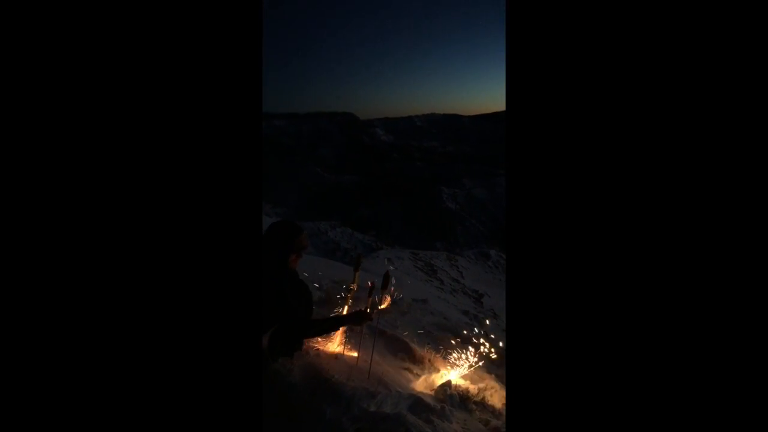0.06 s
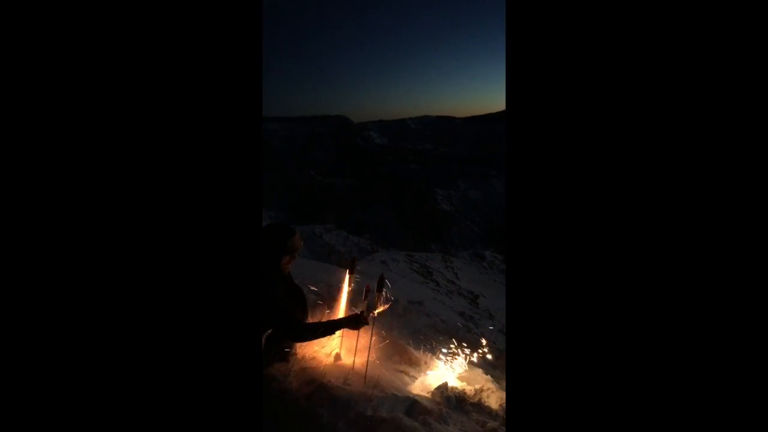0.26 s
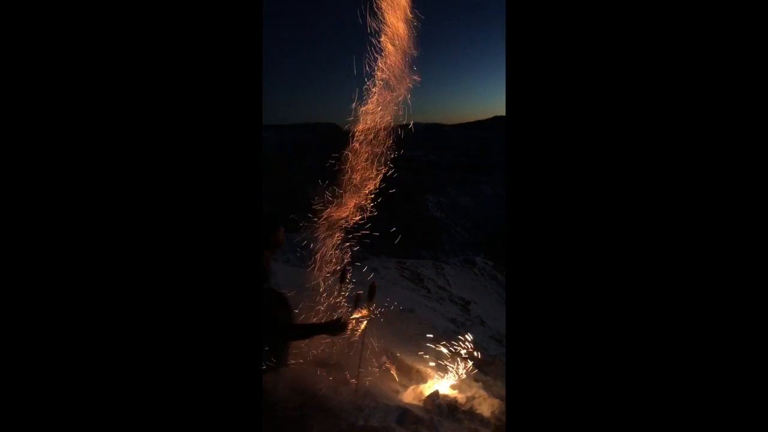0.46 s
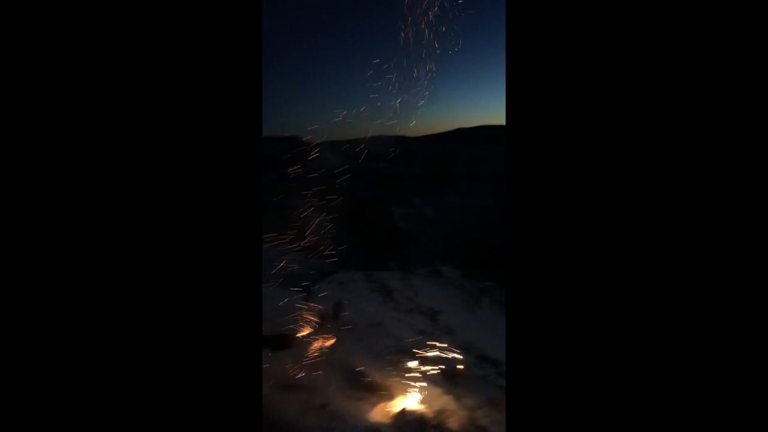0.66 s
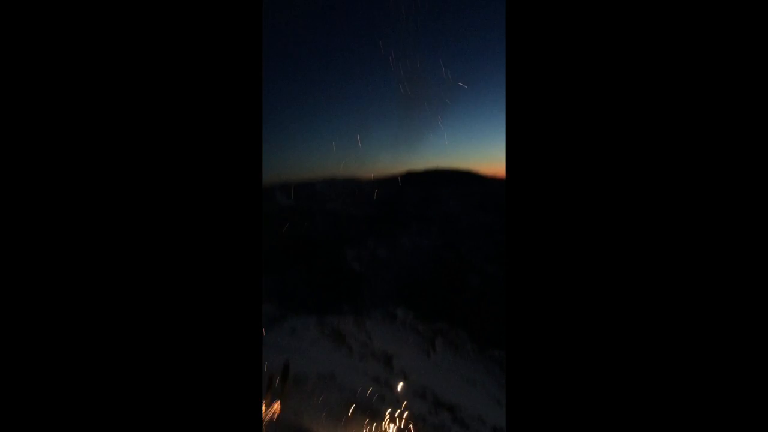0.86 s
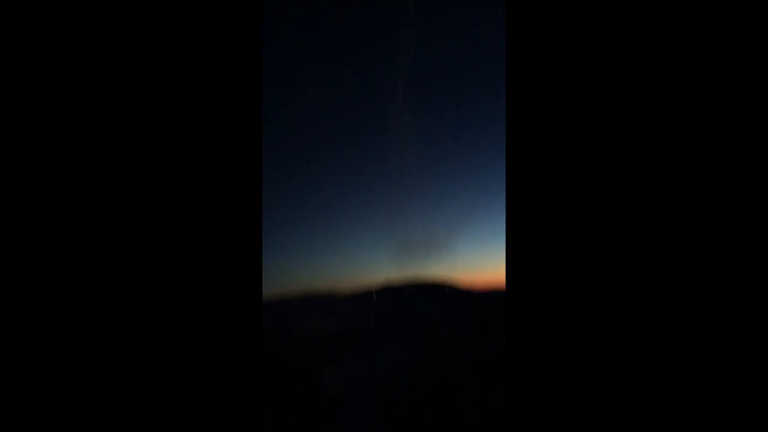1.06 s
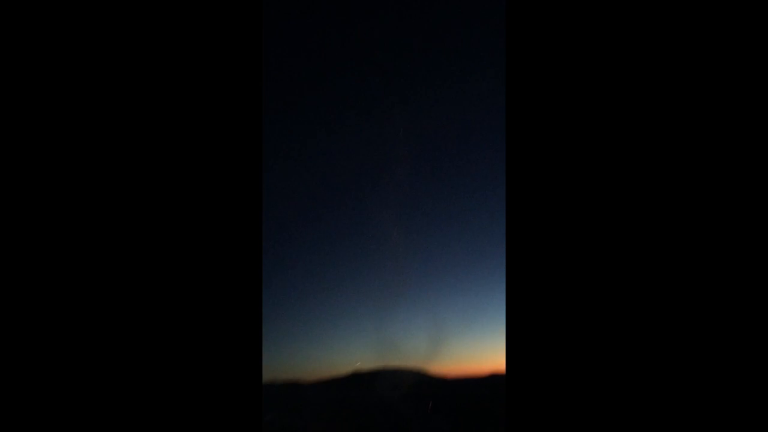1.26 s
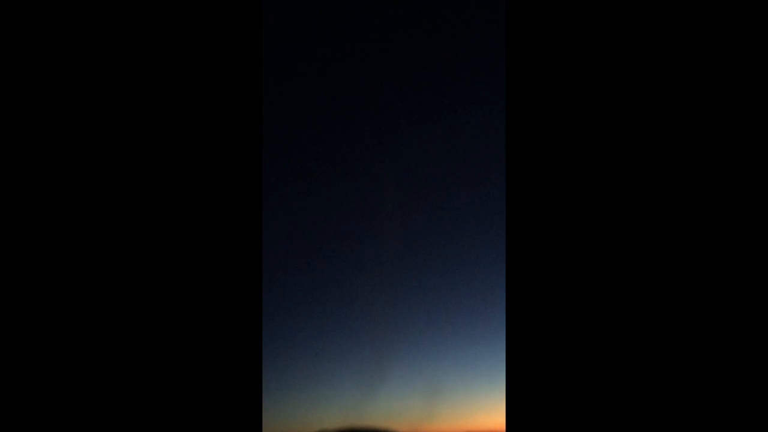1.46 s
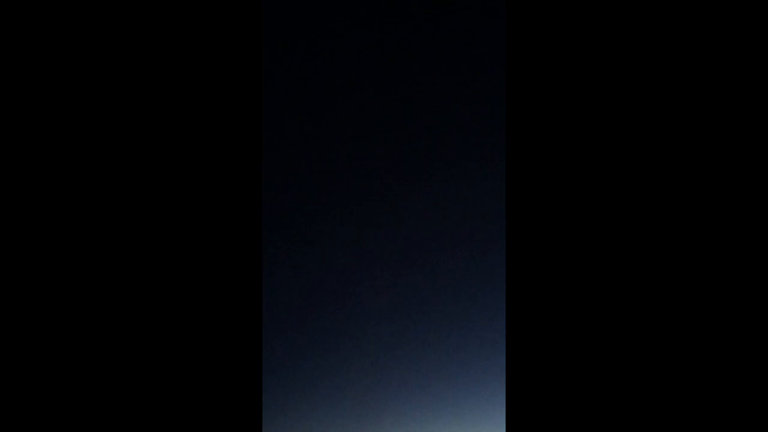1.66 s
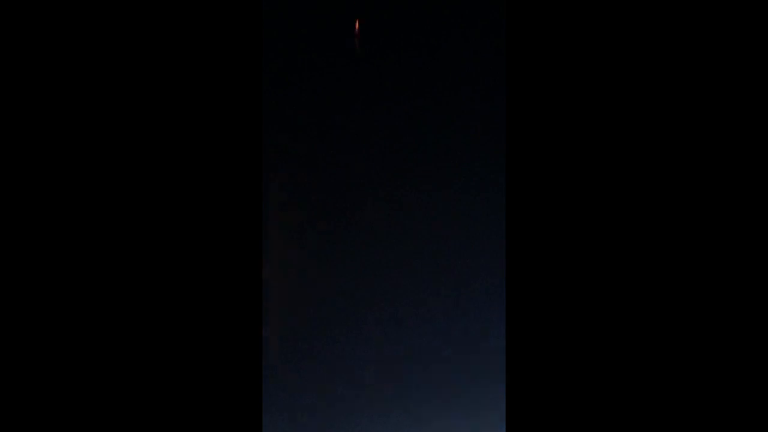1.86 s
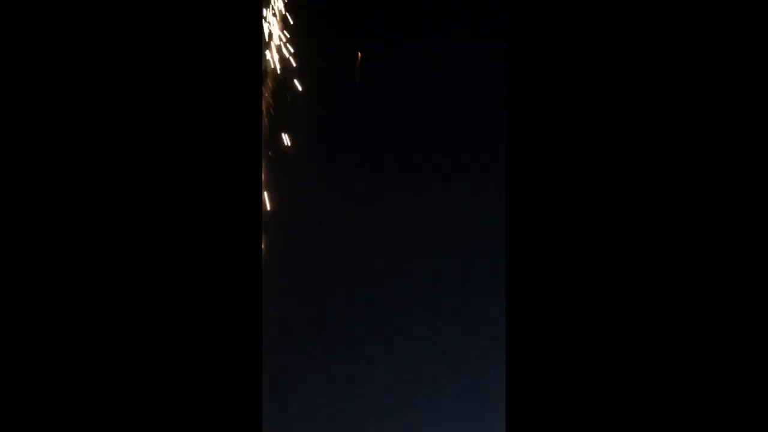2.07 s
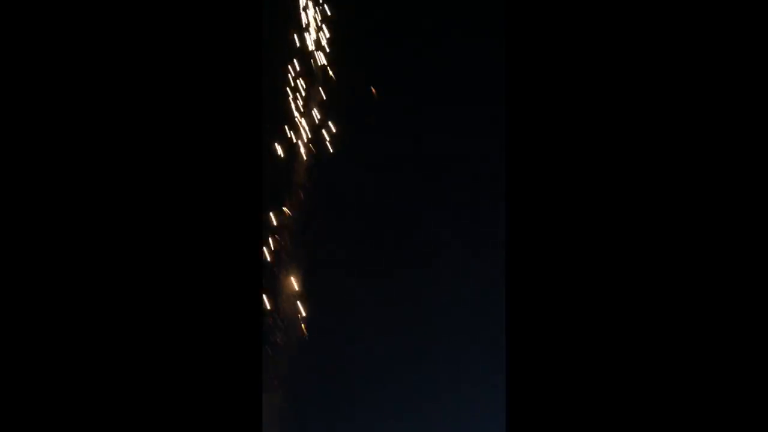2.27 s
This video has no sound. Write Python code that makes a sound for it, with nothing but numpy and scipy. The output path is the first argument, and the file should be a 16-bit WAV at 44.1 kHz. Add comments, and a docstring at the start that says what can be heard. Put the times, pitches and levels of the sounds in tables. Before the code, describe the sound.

Outdoors, close and dry, a firework rocket hiss swells quickly, pops and fades; after a quiet gap with faint sizzle and handling ticks, a second spits, rushes louder, thumps hard and dies away.

```python
"""Two firework rockets take off close by, one after the other, each with a rough, spitting hiss.
The hiss is grainy noise shaped by moving resonances, over a low roar with a sinking hollow note.
Shifting ground echoes colour it; a short pop of exhaust hits the microphone before each hiss dies.
Fuses sizzle faintly throughout, with air buffets, powder spits and a hand on the camera."""
import sys
import numpy as np
from scipy import signal
from scipy.fft import rfft, irfft
from scipy.io import wavfile
from scipy.ndimage import uniform_filter1d, map_coordinates

SR = 44100
rng = np.random.default_rng(int(sys.argv[2]) if len(sys.argv) > 2 else 0)


def pcm_store(signal):
    """Save signal as 16-bit PCM."""
    levels = np.round(np.clip(np.atleast_2d(signal), -1, 1) * 32767)
    wavfile.write(sys.argv[1], SR, levels.astype(np.int16).T)


N = 101429
TIME = np.arange(N) / SR  # seconds

# faint sizzle of the fuses: time_s, level_db
FUSE_LEVEL = [(0, -59), (.8, -55.5), (.88, -57.5), (1.0, -53.5), (1.22, -50.5), (2.0, -37.5), (2.13, -62.5),
              (2.23, -55), (2.3, -62)]
# colour of the fuses: frequency_hz, level_db
FUSE_COLOUR = [(25, -25), (60, -14), (170, -11.5), (300, -8), (600, -10.5), (1200, -10.5), (2500, -9),
               (5500, -10), (11000, -14), (15000, -15.5)]
# a last hiss, still growing when the sound ends: peak_s, level_db, rise_s, decay_s
LAST_SWELL = (3, -51, 1.35, 1)
# colour of that last hiss: frequency_hz, level_db
LAST_SWELL_COLOUR = [(150, -16), (500, -11.5), (1050, -2), (1600, -7.5), (3300, -13), (4200, -5),
                     (5000, -15), (5700, -3.5), (7500, -13), (15000, -20)]

# dry ticks of the hand on the camera: peak_s, level_db
TICKS = [(.917, -47.5), (0.946, -50), (1.074, -42), (1.329, -40)]
# colour of the ticks: frequency_hz, level_db
TICK_COLOUR = [(60, -2), (900, 2), (3000, -5), (6000, -22), (15000, -32)]
TICK_RISE_S, TICK_DECAY_S = 0.0004, 0.0027
# deep rustle of the hand: time_s, level_db
HAND_LEVEL = [(.75, -79), (.9, -68), (1.08, -62), (1.42, -66), (1.55, -80)]
# colour of the rustle: frequency_hz, level_db
HAND_COLOUR = [(20, -7.5), (45, -2), (80, -2), (130, -14), (400, -37)]

# gusts that buffet the microphone: peak_s, level_db, rise_s, decay_s
GUSTS = [(0.055, -47, 0.0046, 0.021), (.352, -40.5, 0.064, 0.045), (.39, -30, 0.009, 0.011),
         (0.919, -59.5, 0.0035, 0.05), (1.255, -62, 0.0037, 0.021), (1.474, -45, 0.0078, 0.019),
         (1.592, -35, 0.0083, 0.0066), (1.918, -41, .006, 0.012), (2.03, -53, 0.016, 0.023)]
# colour of stirred air, in gusts and pops: frequency_hz, level_db
RUMBLE_COLOUR = [(20, -7), (45, -8.5), (80, 4), (150, 3.5), (260, -6.5), (600, -24), (2000, -65)]
# single spits of burning powder: peak_s, level_db, decay_s
SPITS = [(1.471, -37, .007), (1.551, -21, 0.011), (1.593, -22, 0.0024), (1.919, -20, 0.0018)]
# colour of the spits: frequency_hz, level_db
SPIT_COLOUR = [(60, -10), (200, -1), (700, 12.5), (2500, 9.5), (4500, 9), (7000, -12), (15000, -30)]

# pops of exhaust: start_s, push_db, push_length_s, crack_db, whump_pitch_hz, whump_db,
# rumble_db, decay_s
POPS = [(0.485, -22, 0.003, -24, 121, -20, -25, 0.021), (1.876, -6.5, 0.0023, -15, 179, -15.5, -20.5, .02)]
# colour of the dull crack in a pop: frequency_hz, level_db
CRACK_COLOUR = [(60, -17.5), (200, -12), (400, 0), (660, 9), (880, -3.5), (1300, -3.5), (2000, -9),
                (6000, -29)]
POP_SWELL_S, CRACK_DECAY_S, CRACK_LEAD_S = 0.0091, 0.0028, 0.0016
PUSH_LOW_HZ, PUSH_HIGH_HZ = 65.4, 332
WHUMP_END_HZ, WHUMP_SINK_S = 49, 0.01

# hiss of each rocket: time_s, level_db, treble_db (set against TREBLE_USUAL_DB, then stretched)
BURN_A = [(0.0, -39, -12.5), (0.132, -32.5, -6), (0.364, -10.5, -6.5), (0.404, -13.5, -11), (0.44, -16, -8),
          (0.494, -14, -10.5), (0.656, -24.5, -17), (0.736, -36, -15), (0.8, -66.5, -13)]
BURN_B = [(1.235, -62, -17), (1.28, -42.5, -16), (1.335, -35.5, -10), (1.454, -27.5, -5),
          (1.472, -22.5, -8), (1.506, -27, -5), (1.564, -17.5, -8), (1.63, -17, -7), (1.764, -13.5, -12.5),
          (1.914, -15.5, -8), (2.042, -28, -13.5), (2.064, -33.5, -13), (2.13, -73, -10)]
TREBLE_FROM_HZ, TREBLE_FULL_HZ, TREBLE_USUAL_DB, TREBLE_STRETCH = 3050, 12100, -9.5, 1.71
# basic colour of each hiss: frequency_hz, level_db
JET_A = [(40, -58), (200, -35), (480, -19.5), (750, -8), (1000, -5), (1300, -2.5), (1750, -1.5), (3100, -1),
         (5000, -2.5), (6400, -2), (9700, -3.5), (10300, -7.5), (11200, -4.5), (15000, -7.5)]
JET_B = [(150, -51), (480, -15.5), (750, -10), (1150, -1), (1600, -1.5), (2100, 2), (3500, -0.5), (4950, 0),
         (6000, 0), (9800, -2.5), (10350, -8), (11200, -5), (15000, -8)]
# level_db of sparks against the gas; spread_db of their random sizes
SPARKS_PER_S, SPARK_DB, SPARK_SPREAD_DB = 2500, -9, 1
# resonances and notches that come and go: frequency_hz, width_hz, boost_db, strongest_s, lasting_s
RINGS_A = [(1036, 280, 9, 0.24, 0.17), (1710, 310, 7, 0.2, 0.18), (2460, 310, 6, 0.18, 0.22),
           (3020, 150, 10, 0.18, 0.22), (4080, 160, 8.5, 0.1, 0.29), (5850, 170, 11, 0.19, 0.099),
           (6390, 270, 8, 0.13, 0.18), (1250, 120, -4.5, 0.17, 0.42), (3950, 110, 2, .1, .2),
           (6060, 130, -10, 0.14, 0.21)]
RINGS_B = [(850, 328, 5, 1.59, 0.18), (1710, 390, 9, 1.636, 0.13), (3450, 520, 7.5, 1.48, 0.19),
           (4320, 350, 12, 1.45, 0.13), (5600, 2100, 6, 1.32, .1), (1270, 160, -7, 1.5, 0.39),
           (1964, 190, -10.5, 1.44, 0.33), (7000, 2500, 5, 1.72, 0.028), (3700, 1200, 7, 1.937, 0.048)]
# bending of the lower resonances as a rocket leaves the launcher: time_s, frequency_ratio
BEND_A = [(.33, 1), (.42, 1), (.5, .84), (.62, 1)]
BEND_B = [(1.44, 1.15), (1.59, 1.14), (1.69, 0.93), (1.82, 0.86)]
BEND_BELOW_HZ = 2800  # the bending fades out around here

# low roar of each rocket: time_s, level_db (before ROAR_TRIM_DB)
ROAR_A = [(0.0, -88), (0.112, -60.5), (0.352, -26), (0.43, -34.5), (0.49, -26), (0.53, -32), (0.626, -36),
          (0.722, -43.5), (0.8, -78)]
ROAR_B = [(1.25, -80), (1.448, -60), (1.476, -40), (1.5, -46), (1.558, -32), (1.756, -22.5), (1.85, -29),
          (1.91, -29.5), (1.966, -47), (2.056, -45), (2.12, -66)]
ROAR_TRIM_DB, ROAR_NOISE_DB = -0.5, -3.0
# colour of each roar: frequency_hz, level_db
ROAR_COLOUR_A = [(25, -42), (70, -10), (135, -0.5), (200, -2.5), (300, -6), (400, 0.5), (490, -5), (660, 0),
                 (900, -11), (2000, -31)]
ROAR_COLOUR_B = [(25, -35), (70, -28.5), (140, -13.5), (300, -3.5), (450, -10), (560, -2.5), (680, 1.5),
                 (900, -5), (2000, -24)]
# hollow note that sinks as the rocket climbs: time_s, pitch_hz, share_of_roar_db
HOLLOW_A = [(.25, 411, -28), (0.328, 386, -11.5), (.42, 283, -5.5), (0.549, 175.3, -12), (.7, 136, -38)]
HOLLOW_B = [(1.5, 341, -18), (1.598, 338.2, -6.5), (1.739, 273.3, -6.5), (1.801, 207.8, -10.5),
            (1.861, 177.8, -5), (2.05, 110.6, -14)]

# near ground echo of each rocket: time_s, delay_ms, strength (0 to 1)
ECHO_A = [(0, 1.25, 0.27), (.27, 1.14, 0.2), (.39, 1.2, 0.22), (.55, 1.72, 0.38), (.63, 1.564, 0.4),
          (.76, 1.48, 0.23)]
ECHO_B = [(1.3, 1.25, 0.18), (1.47, 1.25, 0.33), (1.56, 1.28, 0.43), (1.67, 1.09, 0.19), (1.75, 1.38, 0.18),
          (1.85, 1.25, 0.096), (2.0, 1.1, 0.075)]
FAR_ECHO = 0.16  # strength of a longer echo, late by one period of the hollow note

KNEE, CEILING = 0.52, 0.73  # peak levels, where 1 is full scale
EDGE_HZ = 15400  # top of the sound band


def amp(db):
    """Turns decibels into a gain."""
    return 10 ** (np.asarray(db) / 20)


def unit(x):
    """Scales a signal to an average (rms) level of one."""
    return x / np.sqrt(np.mean(x ** 2) + 1e-20)


def curve(rows, t, axis=1):
    """Reads one column of a table, joined by straight lines in time."""
    rows = np.array(rows)
    return np.interp(t, rows[:, 0], rows[:, axis])


def colour(points, hz):
    """Reads a spectrum in dB, joined by straight lines on a log-frequency axis."""
    f, db = np.transpose(points)
    return np.interp(np.log(hz + 1), np.log(f + 1), db)


def tinted(x, points):
    """Filters a signal by a colour table and sets its rms to one."""
    hz = np.fft.rfftfreq(N, 1 / SR)
    return unit(irfft(rfft(x) * amp(colour(points, hz)), N))


def noise(points):
    """Makes steady noise of a given colour."""
    return tinted(rng.standard_normal(N), points)


def flutter(hz):
    """Makes a random wobble, mostly slower than the given rate."""
    f = np.fft.rfftfreq(N, 1 / SR)
    shape = f / (f + hz / 10) / (1 + (f / hz) ** 2)
    return unit(irfft(rfft(rng.standard_normal(N)) * shape, N))


def burst(s, rise, decay):
    """Makes an envelope that swells to a peak at s and dies away."""
    return np.exp(-np.maximum((s - TIME) / rise, (TIME - s) / decay))


def burning(rate, spark_db, spread_db):
    """Burning powder: smooth gas noise peppered with tiny cracks of burning grains."""
    happens = rng.random(N) < rate / SR
    direction = rng.choice([-1, 1], N)
    size = amp(spread_db * np.minimum(rng.exponential(1, N), 5))
    sparks = happens * direction * size
    return unit(rng.standard_normal(N) + amp(spark_db) * unit(sparks))


def fuses():
    """Fuses: a faint grainy sizzle of burning grains, with a rising hiss at the end."""
    grains = tinted(burning(rate=920, spark_db=-11.5, spread_db=1.0), FUSE_COLOUR)
    sizzle = grains * amp(curve(FUSE_LEVEL, TIME) + 1.0 * flutter(hz=70))
    s, db, rise, decay = LAST_SWELL
    return sizzle + noise(LAST_SWELL_COLOUR) * amp(db) * burst(s, rise, decay)


def handling():
    """A hand on the camera: skin rubbing makes a deep rustle, small knocks make dry ticks."""
    knocks = sum(amp(db) * burst(s, TICK_RISE_S, TICK_DECAY_S) for s, db in TICKS)
    rustle = noise(HAND_COLOUR) * amp(curve(HAND_LEVEL, TIME))
    return noise(TICK_COLOUR) * knocks + rustle


def gusts():
    """Gusts: moving air presses on the microphone in soft low buffets."""
    envelope = sum(amp(db) * burst(s, rise, decay) for s, db, rise, decay in GUSTS)
    return noise(RUMBLE_COLOUR) * envelope


def spits():
    """Spits: burning powder sputters in brief bursts of noise."""
    envelope = sum(amp(db) * burst(s, 0.0035, decay) for s, db, decay in SPITS)
    return noise(SPIT_COLOUR) * envelope


def pop(s, push_db, length, crack_db, whump_hz, whump_db, rumble_db, decay):
    """A pop: a pressure pulse and dull crack, then a sinking whump in a rumble of stirred air."""
    age = np.maximum(TIME - s, 0)
    started = TIME >= s
    # pressure jumps up, dips below zero and settles
    pulse = started * (1 - age / length) * np.exp(-age / length)
    band = signal.butter(2, [PUSH_LOW_HZ, PUSH_HIGH_HZ], "bandpass", fs=SR, output="sos")
    push = signal.sosfilt(band, pulse)
    push /= abs(push).max()
    crack = noise(CRACK_COLOUR) * burst(s - CRACK_LEAD_S, POP_SWELL_S, CRACK_DECAY_S)
    rumble = noise(RUMBLE_COLOUR) * burst(s + length, POP_SWELL_S, decay)
    pitch_hz = WHUMP_END_HZ + (whump_hz - WHUMP_END_HZ) * np.exp(-age / WHUMP_SINK_S)
    whump = np.sin(2 * np.pi * np.cumsum(pitch_hz * started) / SR) * np.exp(-age / decay)
    attack = amp(push_db) * push + amp(crack_db) * crack
    return attack + amp(whump_db) * whump + amp(rumble_db) * rumble


def hollow(rows, width_hz=100):
    """A hollow note: a narrow band of noise that follows a gliding pitch."""
    low = signal.butter(2, width_hz / 2, fs=SR, output="sos")
    wander = signal.sosfilt(low, rng.standard_normal(N) + 1j * rng.standard_normal(N))
    turn = np.exp(2j * np.pi * np.cumsum(curve(rows, TIME)) / SR)  # lifts the band to the pitch
    return unit((wander * turn).real) * amp(curve(rows, TIME, axis=2))


def jet_hiss(burn, jet, resonances, bend, patchy_db):
    """Hiss of a turbulent jet: burning noise with changing treble and bending resonances."""
    gas = tinted(burning(SPARKS_PER_S, SPARK_DB, SPARK_SPREAD_DB), jet)
    hz, t, z = signal.stft(gas, SR, nperseg=512, noverlap=384)
    octaves = np.log((hz + 1) / TREBLE_FROM_HZ) / np.log(TREBLE_FULL_HZ / TREBLE_FROM_HZ)
    treble = np.clip(octaves, 0, 1)
    tilt = TREBLE_STRETCH * np.outer(treble, curve(burn, t, axis=2) - TREBLE_USUAL_DB)
    # low frequencies bend most
    bend_share = np.exp(-(hz / BEND_BELOW_HZ) ** 2)
    unbent = hz[:, None] / (1 + np.outer(bend_share, curve(bend, t) - 1))
    rings = 0
    for f, width, db, s, span in resonances:
        peak = db / (1 + (2 * (unbent - f) / width) ** 2)
        rings = rings + peak * np.exp(-((t - s) / span) ** 4)
    # random patches smoothed over frequency, then time
    patches = uniform_filter1d(rng.standard_normal(z.shape), size=5, axis=0)
    patches = unit(uniform_filter1d(patches, size=14, axis=1))
    gain = amp(tilt + rings + patchy_db * patches)
    # keep the expected loudness steady, so that only the burn table sets the level
    power = amp(colour(jet, hz))[:, None] ** 2
    gain /= np.sqrt((power * gain ** 2).sum(0) / power.sum())
    hiss = signal.istft(z * gain, SR, nperseg=512, noverlap=384)[1][:N]
    return hiss * amp(curve(burn, TIME))


def ground_echo(direct, echo, note):
    """Ground echoes: two late copies with sliding delays reinforce and cancel parts of the sound."""
    near_delay = curve(echo, TIME) * SR / 1000  # samples
    far_delay = SR / curve(note, TIME)  # samples
    strength = curve(echo, TIME, axis=2)
    near = map_coordinates(direct, [np.arange(N) - near_delay], order=3)
    far = map_coordinates(direct, [np.arange(N) - far_delay], order=3)
    total = direct + strength * near + FAR_ECHO * far
    return total / np.sqrt(1 + strength ** 2 + FAR_ECHO ** 2)


def rocket(burn, jet, roar, roar_colour, note, echo, resonances, bend, rough_db, patchy_db):
    """A rocket: its jet hisses and roars with a rough level, and the ground throws back echoes."""
    hiss = jet_hiss(burn, jet, resonances, bend, patchy_db)
    low = amp(ROAR_NOISE_DB) * noise(roar_colour) + hollow(note)
    low = low * amp(curve(roar, TIME) + ROAR_TRIM_DB)
    # short fades at both ends of the burn
    fade_in = np.clip((TIME - burn[0][0]) / 0.0087 + 1, 0, 1)
    fade_out = np.clip((burn[-1][0] - TIME) / 0.01, 0, 1)
    direct = (hiss + low) * fade_in * fade_out * amp(rough_db * flutter(hz=130))
    return ground_echo(direct, echo, note)


def scene():
    """Both rockets with their pops over the quieter sounds, the same in both channels."""
    background = fuses() + handling() + gusts() + spits()
    pops = sum(pop(*row) for row in POPS)
    first = rocket(BURN_A, JET_A, ROAR_A, ROAR_COLOUR_A, HOLLOW_A, ECHO_A, RINGS_A, BEND_A,
                   rough_db=0.6, patchy_db=1.04)
    second = rocket(BURN_B, JET_B, ROAR_B, ROAR_COLOUR_B, HOLLOW_B, ECHO_B, RINGS_B, BEND_B,
                    rough_db=0.5, patchy_db=1.37)
    mix = background + pops + first + second
    return np.array([mix, mix])


def record(dry):
    """The recorder rounds off the highest peaks, then removes the top of the treble."""
    over = np.maximum(abs(dry) - KNEE, 0)
    room = CEILING - KNEE
    limited = np.sign(dry) * (abs(dry) - over + room * np.tanh(over / room))
    lowpass = signal.firwin(701, EDGE_HZ, window=("kaiser", 12), fs=SR)
    return signal.oaconvolve(limited, lowpass[None], "same")


dry = scene()
out = record(dry)
pcm_store(out)
```